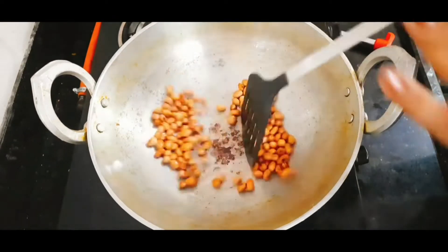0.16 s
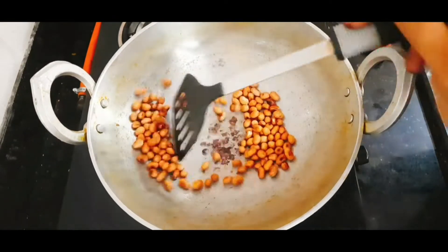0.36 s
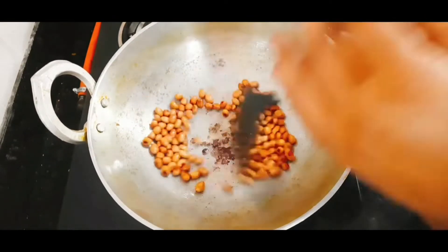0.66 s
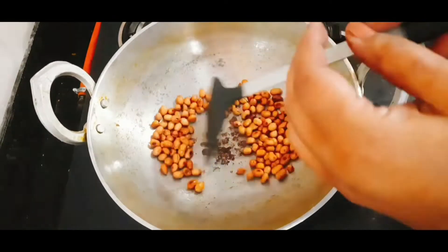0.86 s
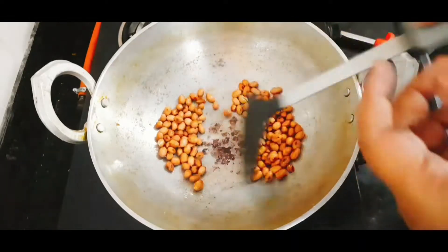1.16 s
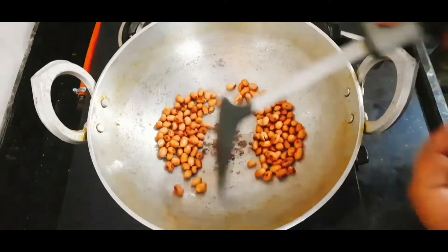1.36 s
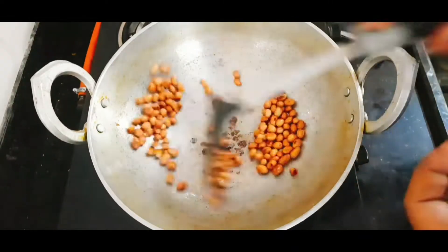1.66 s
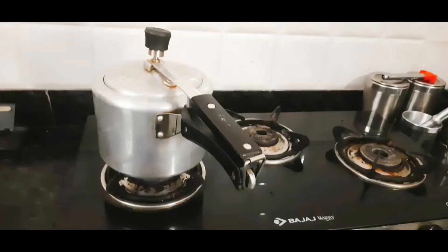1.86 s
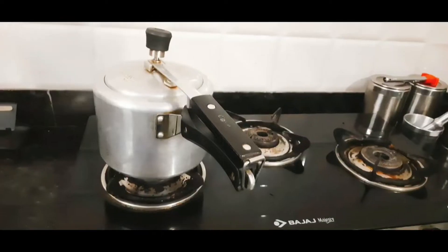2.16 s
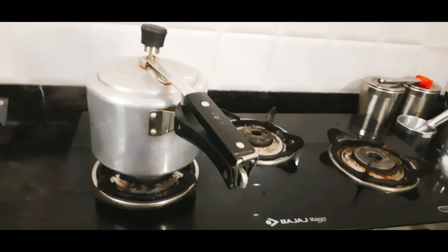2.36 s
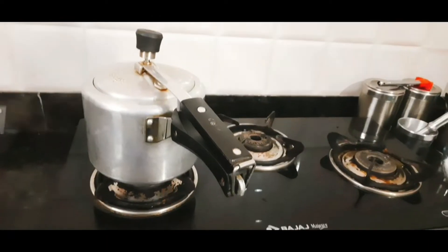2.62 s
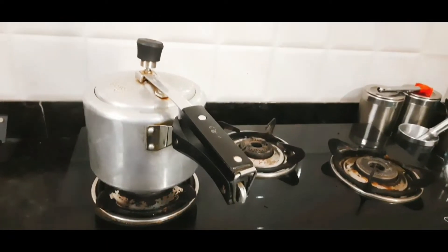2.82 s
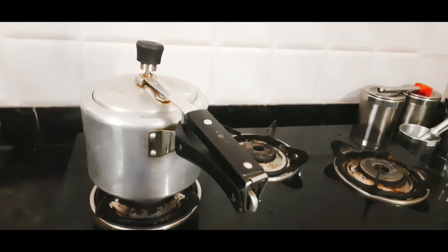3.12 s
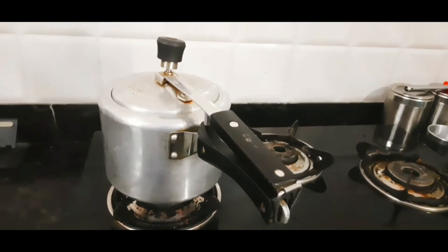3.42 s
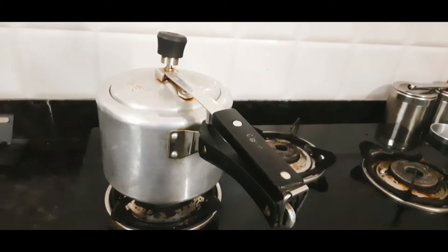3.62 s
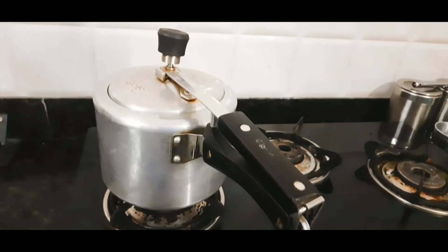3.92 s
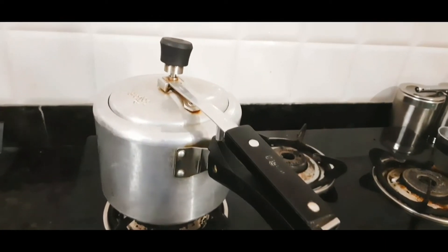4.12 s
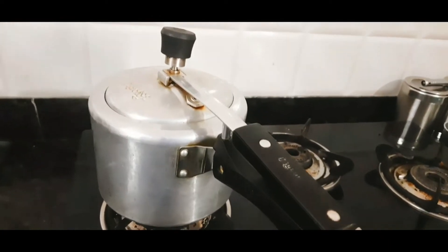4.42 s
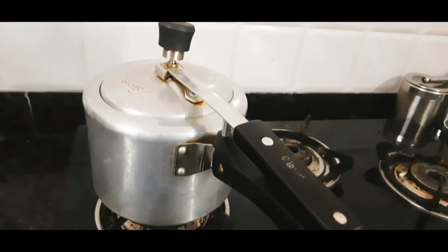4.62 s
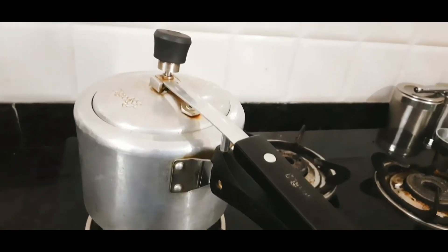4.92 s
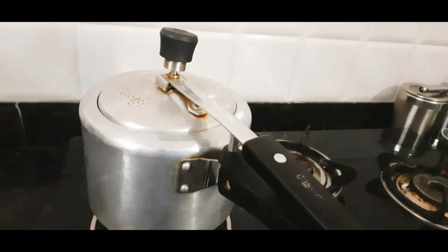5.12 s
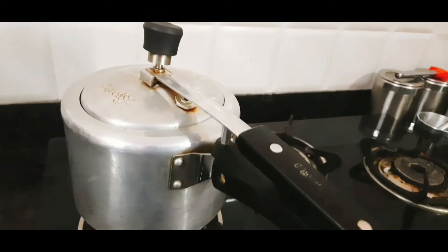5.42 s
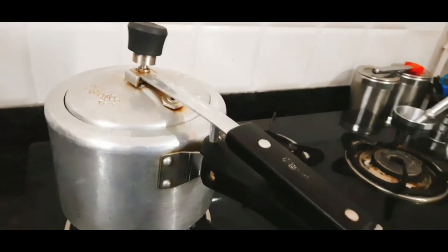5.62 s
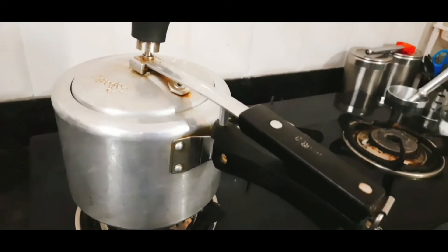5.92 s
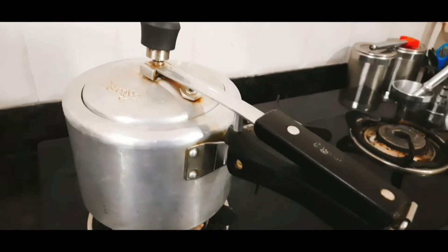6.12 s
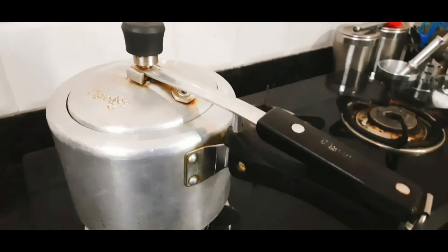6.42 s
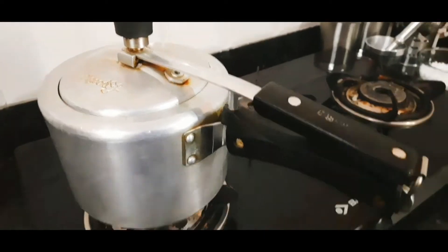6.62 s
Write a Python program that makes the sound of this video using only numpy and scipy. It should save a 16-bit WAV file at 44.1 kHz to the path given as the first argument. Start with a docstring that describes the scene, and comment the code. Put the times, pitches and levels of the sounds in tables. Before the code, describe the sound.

In a small kitchen, a spatula stirs peanuts in a thin metal pan for about two seconds: uneven knocks, gritty scrapes, rattling nuts and short metallic rings over a soft gas flame. The sound cuts out and stutters, then a pressure cooker's steam blasts in, loud, bright and steady. Near the end its weight clacks shut, bounces, and the hiss quickly dies to near quiet. Close handheld stereo phone pickup, the jet's sizzle stronger on the right.

```python
"""Peanuts in a pan, then a steaming cooker

A spatula pushes roasting peanuts round a thin metal pan on a gas stove: knocks, scrapes and ticks ring the pan's
resonances, over shaped flame noise. The sound drops out, stutters twice, and returns beside a pressure cooker.
Steam, made of shaped noise, roars and sizzles until the weight falls shut, bounces and rattles.
It is heard through a phone's two unlike microphone ports; the right one faces the jet and is buffeted by it."""
import sys
import numpy as np
from scipy import signal
from scipy.fft import rfft, irfft, next_fast_len
from scipy.io import wavfile
from scipy.ndimage import uniform_filter1d, map_coordinates

SR = 44100
rng = np.random.default_rng(int(sys.argv[2]) if len(sys.argv) > 2 else 0)


def inscribe(sig):
    """Save sig as 16-bit PCM at rate SR to the path in sys.argv[1].

    A 1-D sig is mono; a 2-D sig holds one channel per row.
    Samples are clipped to [-1, 1] before scaling.
    """
    pcm = np.round(np.clip(np.atleast_2d(sig).T, -1, 1) * 32767)
    wavfile.write(sys.argv[1], SR, pcm.astype(np.int16))


N = 298557  # length in samples
PAN_ENDS_S, SHUT_S = 1.9, 6.463  # the pan and flame stop; the weight falls shut


def amp(db):
    """Turn decibels into a plain multiplier."""
    return 10 ** (np.asarray(db) / 20)


def unit(x):
    """Scale a sound to an rms of 1."""
    return x / np.sqrt(np.mean(x ** 2) + 1e-20)


def along(points, hz):
    """Read a curve of (Hz, value) points on a log frequency axis."""
    f, v = np.transpose(points)
    return np.interp(np.log(hz + 1), np.log(f + 1), v)


def gains(rows):
    """One gain per sample for each dB column after the time, silent outside the table."""
    s, *columns = np.transpose(rows)
    t = np.arange(N) / SR
    return [amp(np.interp(t, s, c, left=-150, right=-150)) for c in columns]


def wobble(rate):
    """A smooth random curve through rate random points a second."""
    points = rng.standard_normal(int(N * rate / SR) + 4)
    return map_coordinates(points, [np.arange(N) * rate / SR])


def filtered(x, response):
    """Shape x by a gain, possibly complex, for each frequency."""
    m = next_fast_len(N + SR // 2)
    return irfft(rfft(x, m) * response(np.fft.rfftfreq(m, 1 / SR)), m)[..., :N]


def body(modes):
    """A few resonances of an object, as a causal response; rows are (Hz, width Hz, dB)."""
    def response(f):
        total = 0
        for k, (c, w, db) in enumerate(modes):
            total = total + (-1) ** k * amp(db) * 1j * f * w / (c * c - f * f + 1j * f * w)
        return total
    return response


def paired(a, b, alike):
    """Left and right mixed from two unrelated signals, as alike as the table says."""
    def mix(hz):
        turn = np.arccos(np.clip(along(alike, hz), -1, 1)) / 2
        return np.array([np.cos(turn), np.sin(turn)])
    mid, side = filtered(np.array([a, b]), mix)
    return np.array([mid + side, mid - side])


def rush(spectrum, alike, patchy_db, length=6):
    """Stereo noise of rms 1 with narrow streaks of random gain, length frames long."""
    z = signal.stft(rng.standard_normal((2, N)), nperseg=512)[2]
    streaks = uniform_filter1d(rng.standard_normal(z.shape[1:]), size=round(length), axis=1)
    a, b = signal.istft(z * amp(patchy_db * unit(streaks)), nperseg=512)[1][:, :N]
    return unit(filtered(paired(a, b, alike), lambda hz: amp(along(spectrum, hz))))


def taps(per_second, spread_db):
    """Sparse tiny impacts of uneven size, one set for each of two signals."""
    hit = rng.random((2, N)) < per_second / SR
    size = amp(spread_db * np.minimum(rng.exponential(size=(2, N)), 4))
    return unit(hit * rng.standard_normal((2, N)) * size)


def swells(start, hold, db, rise, fall):
    """Gain of events that build at rise dB per s, hold, and die at fall dB per s; their powers add."""
    t = np.arange(0, N / SR, .001)
    power = 0
    for s, h, d in zip(start, hold, db):
        level_db = d - rise * np.maximum(s - t, 0) - fall * np.maximum(t - s - h, 0)
        power = power + amp(2 * level_db)
    return np.interp(np.arange(N) / SR, t, np.sqrt(power))


def wavering(rows, rise, fall, drift):
    """A mode kept ringing by a rolling load: a tone whose pitch wanders round that of each swell."""
    s, hold, hz, db = np.transpose(rows)
    pitch = np.interp(np.arange(N) / SR, s + hold / 2, hz) * (1 + drift * wobble(24.93))
    tone = np.sqrt(2) * np.sin(2 * np.pi * np.cumsum(pitch) / SR)
    return swells(s, hold, db, rise, fall) * amp(0.79 * wobble(59.7)) * tone


# how the quiet kitchen's loudness changes: t/s, level/dB
ROOM_LEVEL = [(1.9, -34), (2.02, -30.5), (2.03, -34.5), (2.2, -38.5), (2.3, -49.5), (6.45, -51),
              (6.53, -40), (6.6, -46), (6.77, -52)]
# tone of the kitchen noise: f/Hz, level/dB (per Hz)
ROOM_TONE = [(20, -29), (45, -19), (80, -13), (110, -1.5), (160, -10.5), (200, -13.5), (280, -9),
             (450, -21.5), (1000, -23.5), (3000, -45), (16000, -71)]
# how alike left and right are, also for the layers below: f/Hz, likeness (1 = the same)
LIKENESS = [(60, 0.99), (290, 0.82), (640, 0.58), (1400, 0.047), (9000, 0.35), (15000, 0.81)]


def kitchen():
    """The quiet background: shaped noise, mostly low, that follows a level curve."""
    return gains(ROOM_LEVEL)[0] * rush(ROOM_TONE, LIKENESS, patchy_db=4.5)


# low roar of the gas flame: f/Hz, level/dB (per Hz)
FLAME_ROAR = [(20, -40), (45, -9.5), (80, -4.5), (120, -3.5), (145, -6.5), (180, -19.5), (300, -11.5),
              (500, -34.5)]
# hiss of the gas flame: f/Hz, level/dB (per Hz)
FLAME_HISS = [(710, -28), (1200, -15), (1660, -29), (3070, -5), (4500, -3), (7670, 10), (8640, -7),
              (12500, 6), (13700, 4), (15800, -24)]


def flame():
    """Burning gas: a low roar and a gently swaying hiss, both shaped noise."""
    hiss = amp(.8 * wobble(9)) * rush(FLAME_HISS, LIKENESS, patchy_db=1.5, length=5)
    return amp(-40.5) * hiss + amp(-33.0) * rush(FLAME_ROAR, LIKENESS, patchy_db=6.0)


# the load presses and the stove top hums: arrives t/s, holds t/s, pitch f/Hz, level/dB
STOVE_HUMS = [(0.0, 0.21, 104.9, -35.5), (0.54, 0.07, 110.7, -25.5), (0.66, 0.052, 108.8, -29),
              (0.76, 0.047, 125.3, -40), (0.995, 0.048, 112.4, -33), (1.125, 0.18, 109.2, -32.5),
              (1.393, 0.013, 125.2, -33), (1.505, 0.024, 109.1, -32), (1.62, 0.039, 124.1, -35),
              (1.76, 0.14, 105.3, -31.5)]


def stove_top():
    """The pressed stove top hums: a low tone that swells and wavers."""
    return wavering(STOVE_HUMS, rise=280, fall=610, drift=0.0615)  # dB per s, dB per s, share of the pitch


# the heap of nuts shifts and the bowl rings: arrives t/s, holds t/s, pitch f/Hz, level/dB
BOWL_RINGS = [(0.046, .01, 256, -38.5), (0.164, 0.089, 251, -36.5), (0.452, 0.0046, 254, -29.5),
              (0.52, 0.0035, 249, -21.5), (0.58, 0.18, 256, -43), (1.02, 0.0088, 274, -38),
              (1.18, 0.1, 258, -47), (1.472, 0.018, 255, -31), (1.53, 0.022, 259, -39),
              (1.8, .02, 257, -35.5)]


def bowl():
    """The heap of nuts shifts and keeps the bowl ringing: a wavering tone that swells."""
    return wavering(BOWL_RINGS, rise=490, fall=570, drift=0.027)


# a mode sings under the dragging blade or rolling heap: arrives t/s, holds t/s, pitch f/Hz, level/dB
SUNG_MODES = [(0.01, .05, 1190, -50), (0.111, .07, 405, -44), (0.11, 0.018, 1190, -45),
              (0.27, 0.064, 790, -44), (0.281, .06, 1100, -50), (0.287, 0.034, 690, -46),
              (0.309, .08, 405, -51), (0.48, .015, 690, -46), (0.52, .03, 1120, -44),
              (0.599, .03, 1200, -49), (0.696, 0.046, 690, -51), (0.87, .015, 800, -46),
              (0.982, .04, 405, -43), (1.106, .035, 1100, -44), (1.115, .05, 400, -42),
              (1.192, .04, 3100, -54), (1.207, .04, 560, -50), (1.241, .06, 370, -41.5),
              (1.256, 0.083, 700, -48), (1.459, .11, 700, -49.5), (1.638, .025, 430, -41),
              (1.694, .03, 590, -50), (1.76, 0.095, 1193, -43), (1.79, 0.057, 650, -51)]
SING_RISE, SING_FALL = 620, 430  # dB per s
SING_DRIFT, FLUTTER_DB = .008, 2.3  # share of the pitch; dB


def singing():
    """Pan modes kept sounding by rubbing: nearly steady tones that swell, flutter and die."""
    out, lead = np.zeros(N), SR // 10
    drift, flutter = wobble(30), wobble(50)
    for s, hold, hz, db in SUNG_MODES:
        span = slice(max(round(s * SR) - lead, 0), round((s + hold) * SR) + 2 * lead)
        t = np.arange(N)[span] / SR
        level_db = db - SING_RISE * np.maximum(s - t, 0) - SING_FALL * np.maximum(t - s - hold, 0)
        level_db = level_db + FLUTTER_DB * np.roll(flutter, rng.integers(N))[span]
        pitch = hz * (1 + SING_DRIFT * np.roll(drift, rng.integers(N))[span])
        out[span] += amp(level_db) * np.sqrt(2) * np.sin(2 * np.pi * np.cumsum(pitch) / SR)
    return out


# low resonances of the pan, also rung by the knocks: f/Hz, width f/Hz, level/dB
LOW_MODES = [(253, 22, -4), (300, 30, -8), (405, 22, -3), (500, 40, -9), (600, 35, -11), (690, 35, -6),
             (780, 40, -11), (890, 50, -12), (1090, 40, -13), (1190, 60, -14)]


def scraping():
    """Grit under the blade; as the blade travels, different modes of the pan take the sound up."""
    grit = paired(*taps(4000, spread_db=.8), LIKENESS)
    modes = 0
    for mode in LOW_MODES[1:]:
        modes = modes + amp(4.5 * wobble(8.25)) * filtered(grit, body([mode]))
    rasp = filtered(grit, lambda hz: amp(-8.0) * (hz > 300) / (1 + (hz / 1200) ** 4))
    return unit(modes + rasp)


# high resonances of the pan, also rung by the knocks: f/Hz, width f/Hz, level/dB
HIGH_MODES = [(2600, 650, -7.5), (3190, 126, 0), (3800, 140, -4.5), (4840, 430, -2.5), (5560, 540, -4.5),
              (6750, 360, -4.5), (7800, 350, 3.5)]


def rattling():
    """Nuts tick densely on the pan; as the heap shifts, different high modes take the sound up."""
    ticks = amp(1.3 * wobble(45)) * taps(2200, spread_db=1.1)
    modes = 0
    for mode in HIGH_MODES:
        modes = modes + amp(3 * wobble(13.6)) * filtered(ticks, body([mode]))
    patter = filtered(ticks, lambda hz: amp(-4) * (hz > 1400) / (1 + (hz / 9000) ** 4))
    return unit(modes + patter)


# strokes of the blade: arrives t/s, holds t/s, blade scrape level/dB, nut rattle level/dB
BLADE_STROKES = [(0.054, 0.034, -46, -41), (0.11, 0.023, -31, -32.5), (0.16, .015, -34, -32),
                 (0.214, 0.16, -40.5, -39.5), (0.437, 0.05, -36.5, -37), (0.512, 0.03, -34, -38),
                 (0.58, 0.034, -47, -48), (0.83, 0.044, -55.5, -40), (0.981, 0.013, -54, -39),
                 (1.0, .035, -51, -47.5), (1.063, .015, -56, -40), (1.101, 0.015, -34, -40),
                 (1.18, 0.058, -50, -46), (1.43, .07, -54, -45.5), (1.534, 0.02, -60, -48),
                 (1.602, 0.0094, -69, -34.5), (1.63, 0.013, -37.5, -31.5), (1.676, 0.1, -41.5, -41),
                 (1.818, 0.022, -46, -37.5)]
SCRAPE_REST_DB, RATTLE_REST_DB = -42.5, -49  # steady level added under the strokes


def stirring():
    """Blade and nuts rub the pan in strokes and keep its modes, the bowl and the stove top sounding."""
    s, hold, scrape_db, rattle_db = np.transpose(BLADE_STROKES)
    scrape = swells(s, hold, scrape_db, rise=1500, fall=220) + amp(SCRAPE_REST_DB)
    rattle = swells(s, hold, rattle_db, rise=1800, fall=440) + amp(RATTLE_REST_DB)
    rings = stove_top() + bowl() + singing()
    return rings + scrape * scraping() + rattle * rattling()


def struck(modes, rise, t):
    """Modes of the pan after one blow: dying tones, each of uneven strength and random sign."""
    total = 0
    for hz, w, db in modes:
        strength = rng.choice([-1, 1]) * amp(db + rng.normal(0, 2))
        total = total + strength * np.exp(-np.pi * w * t) * np.sin(2 * np.pi * hz * t)
    return total * (1 - np.exp(-t / rise))


# knocks of blade and nuts on the pan: t/s, then relative click level/dB, thud level/dB, rebound level/dB
PAN_KNOCKS = [(0.071, -17, -38, -36), (0.1106, -19, -28, -25), (0.1592, -7.5, -28, -13),
              (0.282, -29, -26, -27), (0.361, -18, -31, -38), (0.441, -28, -30, -25),
              (0.5135, -18, -22, -30), (0.529, -17, -34, -36), (0.817, -27, -46, -34),
              (0.869, -25, -31, -32), (0.89, -25, -40, -40), (0.983, -18, -29, -32), (1.064, -28, -40, -40),
              (1.099, -20, -24.5, -33), (1.19, -28, -33, -40), (1.25, -32, -29, -30),
              (1.467, -32, -31, -28), (1.421, -32, -36, -27), (1.597, -17, -47, -44), (1.72, -24, -40, -40),
              (1.6305, -12, -41, -19), (1.642, -16, -40, -30)]


def knocks():
    """Each knock is one blow and a short chatter that ring the pan's modes unevenly."""
    t, out = np.arange(3000) / SR, np.zeros((2, N + 3000))
    for s, click_db, thud_db, rebound_db in PAN_KNOCKS:
        # noise that dies in two stages, each time being a fall of 60 dB
        chatter = rng.standard_normal((2, len(t))) * (amp(-60 * t / 0.0047) + 0.22 * amp(-60 * t / 0.044))
        click = amp(click_db) * (.15 * struck(HIGH_MODES, .0001, t) + .3 * chatter)
        rebound = np.sin(2 * np.pi * 690 * t) * amp(rebound_db - 60 * t / 0.01)  # the blade's stiff edge
        thud = amp(thud_db) * struck(LOW_MODES, 0.0036, t)
        start = round(s * SR)
        out[:, start:start + len(t)] += (click + rebound + thud) * amp([[1.5], [-1.5]])  # left, right dB
    return out[:, :N]


# resonances of the cooker's lid: f/Hz, width f/Hz, level/dB
LID_MODES = [(600, 280, -5), (860, 190, 2.5), (1100, 400, 1), (1410, 270, -3.5)]
# the weight lands and bounces: t/s, relative level/dB
WEIGHT_LANDINGS = [(6.464, -21), (6.49, -29), (6.528, -27)]


def weight():
    """The weight lands on the vent, bounces and rattles on the lid before it settles."""
    gain = swells([SHUT_S], [0.025], [-31], rise=0, fall=180)  # holds s, level dB, then dB per s
    gain = (np.arange(N) > SHUT_S * SR) * gain
    rattle = unit(filtered(paired(*rng.standard_normal((2, N)), LIKENESS), body(LID_MODES)))
    blows = np.zeros(N)
    for s, db in WEIGHT_LANDINGS:
        blows[round(s * SR)] = amp(db + 26)
    return gain * rattle + filtered(blows, body(LID_MODES))


# larger steam puffs that hit the right port: t/s, relative level/dB
STEAM_PUFFS = [(2.173, -21), (2.554, -19), (2.782, -34), (2.817, -20.5), (2.836, -31), (2.883, -18.5),
               (3, -30), (3.239, -26), (3.618, -31), (4.084, -21), (4.173, -30), (4.803, -33), (5.01, -27),
               (5.148, -23), (5.198, -27), (5.24, -21)]


def puffs():
    """Air pushes on the right membrane, which swings back ever more slowly; small puffs keep coming."""
    push = amp(-29.5) * taps(80, spread_db=-6.0)[0] * gains([(2.15, 0), (6.46, 0.0054)])[0]
    for s, db in STEAM_PUFFS:
        # three pushes of random direction, close together
        at = round(s * SR) + np.array([0, rng.integers(250, 600), rng.integers(600, 1100)])
        push[at] += amp(db + 44.5) * rng.choice([-1, 1], 3) * [.85, .45, .35]

    def membrane(hz):
        # the vent behind the membrane delays the lowest frequencies most
        delay = 1 - 2 * body([(55, 60, 0)])(hz)
        return body([(90, 140, 0)])(hz) / (1 + 1j * hz / 600) ** 2 * delay
    return filtered(push, membrane) * np.array([[.05], [1]])  # left, right


# core of the cavity's noise, before its pitch slides: f/Hz, level/dB (per Hz)
CAVITY_CORE = [(2700, -26.5), (2950, -1.5), (3080, -1), (3210, -5.5), (3460, -23)]
# its broad skirt, before its pitch slides: f/Hz, level/dB (per Hz)
CAVITY_SKIRT = [(1900, -26), (2450, -10), (2800, -1), (3200, 0), (3500, -7), (4300, -24)]
CAVITY_HZ = 3080  # pitch at which core and skirt are not shifted


def cavity(s, pitch, core_db, skirt_db):
    """The cavity under the weight colours the roar; its pitch slides and its width breathes."""
    t = np.arange(N) / SR
    core = rush(CAVITY_CORE, [(100, 0.24)], patchy_db=3, length=6)
    skirt = rush(CAVITY_SKIRT, [(100, 0.24)], patchy_db=3, length=6)
    both = core * amp(np.interp(t, s, core_db) + 1.5 * wobble(7))
    both = both + skirt * amp(np.interp(t, s, skirt_db) + .6 * wobble(6))
    slide = np.exp(2j * np.pi * np.cumsum(np.interp(t, s, pitch) - CAVITY_HZ) / SR)
    return np.real(signal.hilbert(both, next_fast_len(N))[:, :N] * slide)


# venting, relative levels: t/s, roar level/dB, sizzle level/dB, cavity pitch f/Hz,
# its narrow core level/dB, its broad skirt level/dB (both on top of the roar)
VENTING = [(2.147, -21, -12.5, 3120, -14, -4), (2.3, -20, -13.5, 3080, -11, -4),
           (2.65, -20, -12.5, 3050, -11, -5), (2.9, -20, -12, 3150, -11, -8),
           (3.5, -20.5, -12, 3060, -11, -5), (4.0, -20, -12, 3000, -9, -10), (4.4, -20, -12, 3020, -10, -9),
           (4.8, -19.5, -11.5, 3060, -11, -10), (5.4, -20, -11.5, 3000, -11, -11),
           (5.9, -20, -13.5, 3110, -11, -12), (6.41, -20, -13.5, 3200, -9, -9),
           (6.44, -22.5, -14, 3280, -13, -13)]
# steam heard off the walls and lid: f/Hz, level/dB (per Hz)
ROAR_TONE = [(40, -27), (300, -19.5), (1000, -13), (1500, -7), (2300, -3), (3100, 0), (3900, 0.5),
             (5500, 0), (6700, 3.5), (7700, 4.5), (8700, -5), (10000, -6), (16000, -11)]
# steam heard straight from the vent: f/Hz, level/dB (per Hz)
SIZZLE_TONE = [(7000, -45), (9000, -53), (10500, -13), (12000, -3.5), (13300, 1), (14300, 1), (14700, 3),
               (15900, -6.5)]
# faint hiss before the vent opens: t/s, level/dB
LEAK_LEVEL = [(1.9, -29.5), (2.02, -36), (2.03, -58), (2.14, -67)]
# once the weight is down the kitchen rings out, in dB per s; the last two fall faster than the roar by this much
ROAR_FALL, JET_FALL, CAVITY_FALL, TREBLE_FALL = 104, 230, 17, 45
JET_DROP_DB, JET_REST_DB = -4.5, -63  # sudden drop at the shut; relative level where the jet rests
SWAY_DB, TREBLE_FLICKER_DB = .15, 1.1


def steam():
    """The roar arrives from all sides; the jet's sizzle comes straight, mostly into the right port."""
    s, roar_db, jet_db, pitch, core_db, skirt_db = np.transpose(VENTING)
    t = np.arange(N) / SR
    shut = np.maximum(t - SHUT_S, 0)  # seconds since the weight fell
    is_open = t > s[0]
    flow_db = SWAY_DB * (wobble(4.51) + 2.0 * wobble(12.0))
    roar_gain = is_open * amp(np.interp(t, s, roar_db) - ROAR_FALL * shut)
    jet_level_db = np.interp(t, s, jet_db) + JET_DROP_DB * (shut > 0) - JET_FALL * shut
    jet_gain = is_open * (amp(jet_level_db) + amp(JET_REST_DB))

    wide = rush(ROAR_TONE, [(100, 0.07)], patchy_db=3, length=4)
    dull = filtered(wide, lambda hz: 1 / (1 + (hz / 5000) ** 6))
    treble = (wide - dull) * amp(TREBLE_FLICKER_DB * wobble(16) - TREBLE_FALL * shut)
    wide = dull + treble
    coloured = wide + amp(-CAVITY_FALL * shut) * cavity(s, pitch, core_db, skirt_db)
    roar = coloured * roar_gain * amp(2.5 + flow_db)
    leak = wide * gains(LEAK_LEVEL)[0]

    jet = rush(SIZZLE_TONE, [(9000, 0.36), (11000, 1.0), (14000, 0.95)], patchy_db=1.7, length=5)
    jet = jet * jet_gain * amp(flow_db)
    return roar + leak + jet * amp([[-4], [2.5]])  # left, right dB


def scene():
    """Add up all layers; the flame and the stirring end together, a little louder on the left."""
    at_pan = np.arange(N) < PAN_ENDS_S * SR
    pan = at_pan * (flame() + stirring()) * amp([[1.2], [-1.2]])
    return kitchen() + pan + knocks() + weight() + puffs() + steam()


# the sound drops out: out t/s, back t/s, first step level/dB, linger t/s, climb back (dB per s)
SILENCES = [(1.86, 1.9573, -7.5, 0.03, 29997), (1.995, 2.049, -18, 0.018, 2100),
            (2.104, 2.15, -11, .017, 7000)]
FADE_DB_PER_S, PLUNGE_DB_PER_S = 1098, 4500  # fall from the start; extra fall after lingering
BEFORE_RETURN_DB = -26  # end of the climb, just before full level


def dropouts():
    """Each drop-out steps down, lingers, plunges to near silence and climbs just before it ends."""
    t, gain = np.arange(N) / SR, np.ones(N)
    for out, back, step_db, linger, climb in SILENCES:
        going = step_db - FADE_DB_PER_S * (t - out) - PLUNGE_DB_PER_S * np.maximum(t - out - linger, 0)
        coming = BEFORE_RETURN_DB - climb * (back - t)
        gap = amp(np.minimum(np.maximum(going, coming), 0))
        gain = np.where((t > out) & (t < back), gap, gain)
    return gain


# unlike colour of the two ports: f/Hz, left over right level/dB
PORT_COLOUR = [(60, -0.5), (1000, -0.5), (3300, 2.5), (7500, 3.5), (8500, -1.5), (9300, -6.5), (11000, -7),
               (15000, -1.5)]
TOP_HZ, EDGE_HZ = 15760, 25  # band limit and how gradual its edge is


def record(dry):
    """Each port has its own colour; loud peaks round off; the treble stops at the band limit."""
    halves = np.array([[.5], [-.5]])  # half the difference to each side
    ports = filtered(dry, lambda hz: amp(along(PORT_COLOUR, hz) * halves))
    clipped = ports / (1 + np.abs(ports) ** 5) ** (1 / 5)
    return filtered(clipped * dropouts(), lambda hz: (1 - np.tanh((hz - TOP_HZ) / EDGE_HZ)) / 2)


dry = scene()
out = record(dry)
inscribe(out)
```